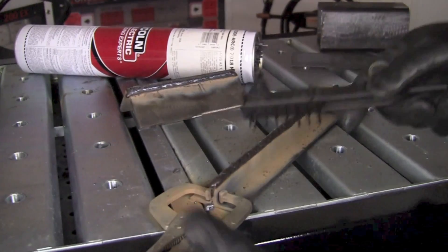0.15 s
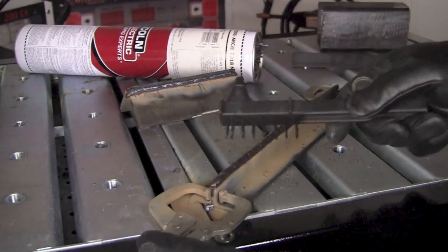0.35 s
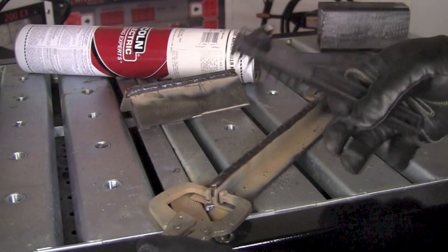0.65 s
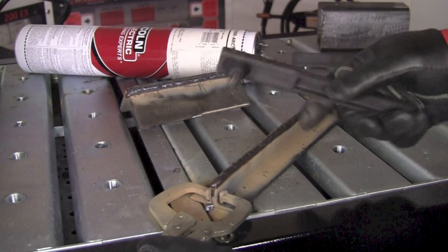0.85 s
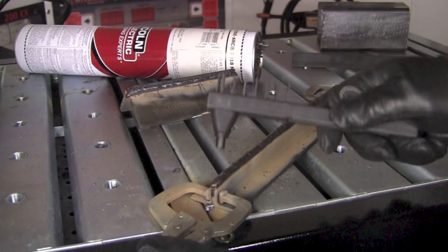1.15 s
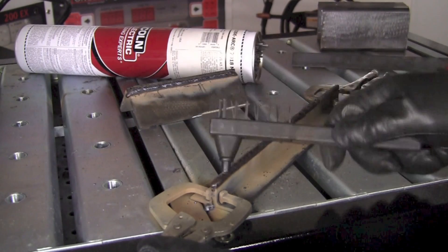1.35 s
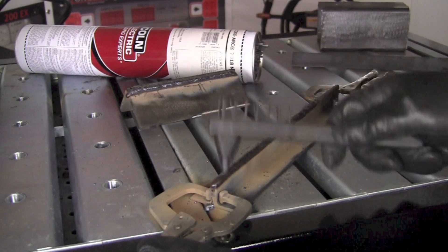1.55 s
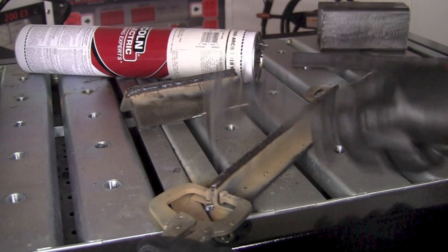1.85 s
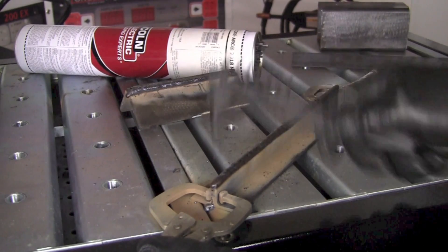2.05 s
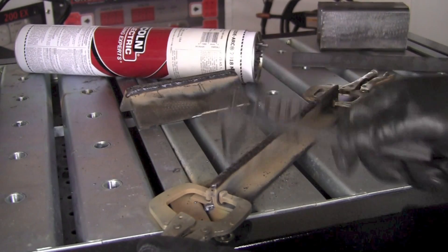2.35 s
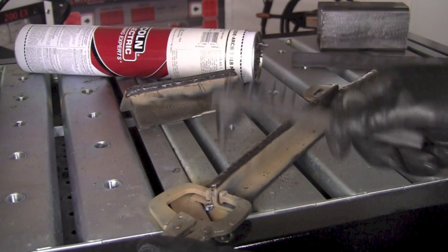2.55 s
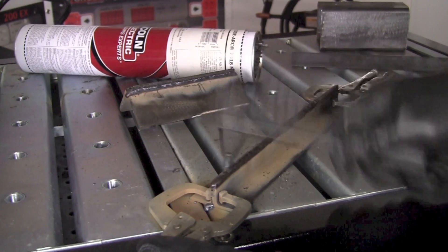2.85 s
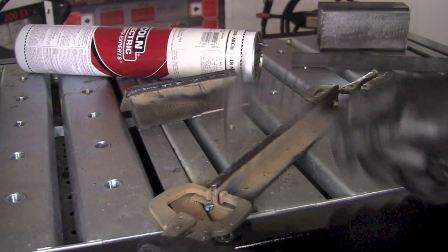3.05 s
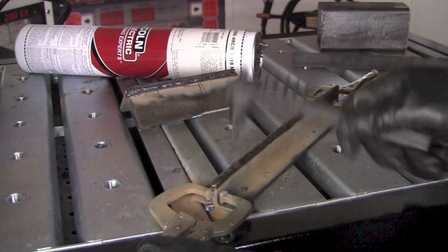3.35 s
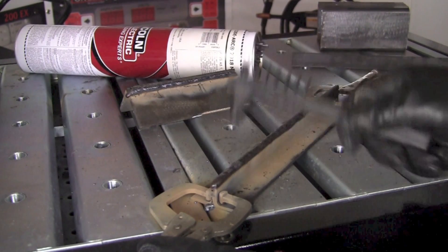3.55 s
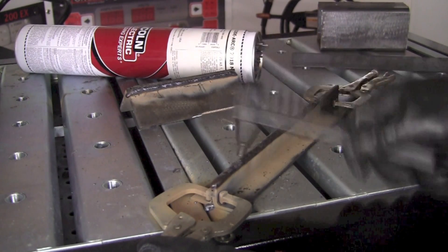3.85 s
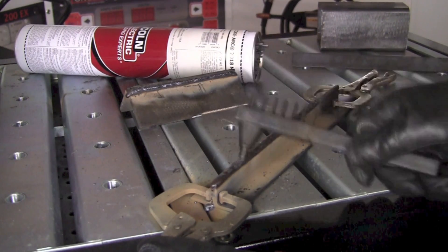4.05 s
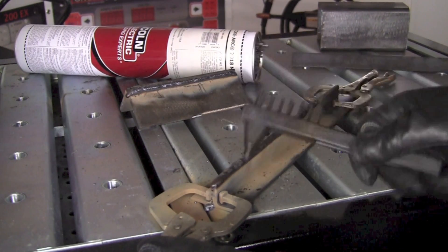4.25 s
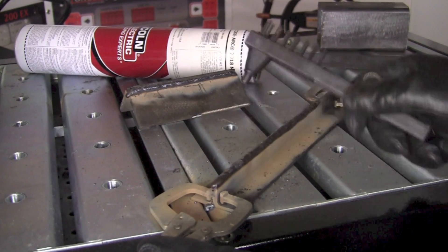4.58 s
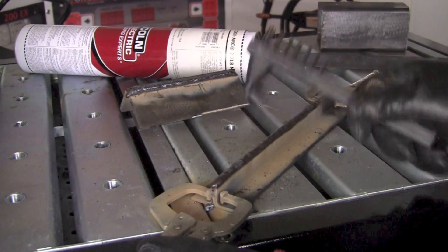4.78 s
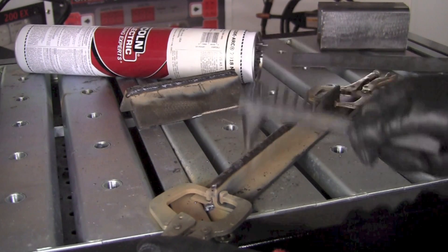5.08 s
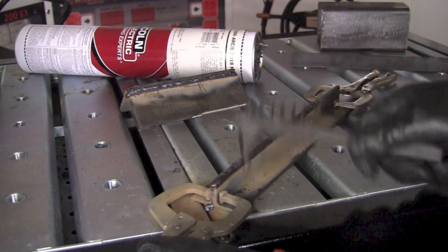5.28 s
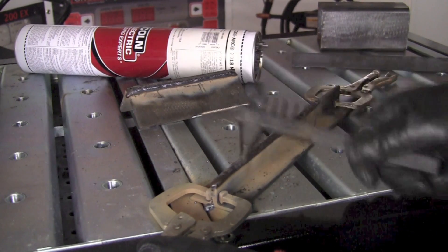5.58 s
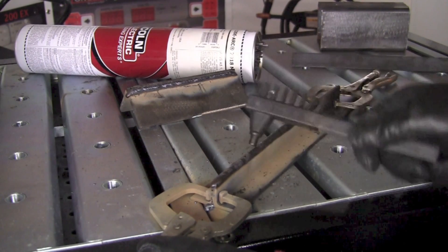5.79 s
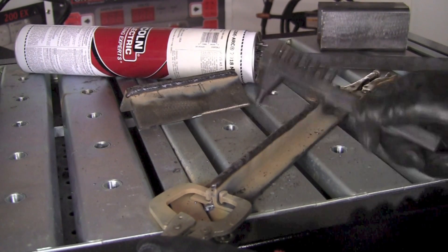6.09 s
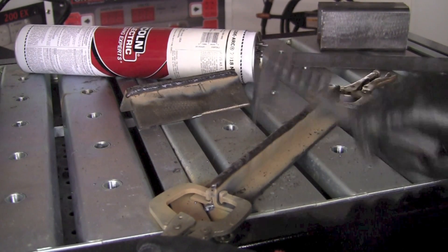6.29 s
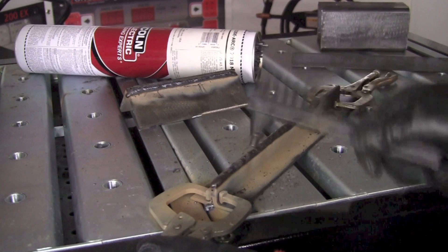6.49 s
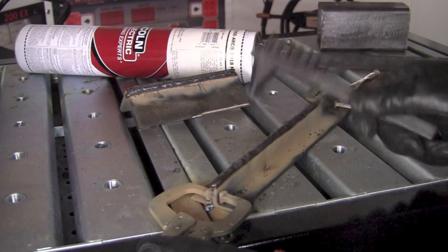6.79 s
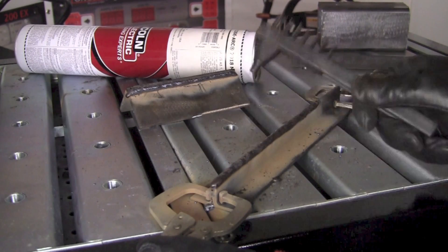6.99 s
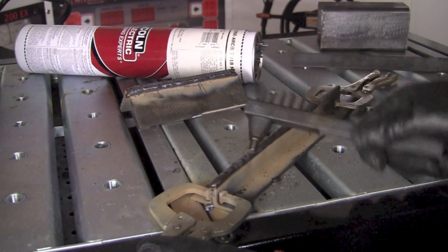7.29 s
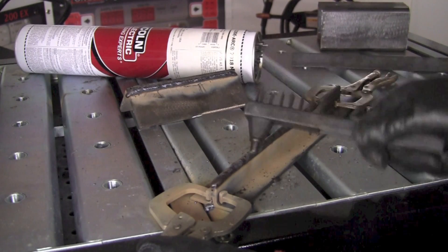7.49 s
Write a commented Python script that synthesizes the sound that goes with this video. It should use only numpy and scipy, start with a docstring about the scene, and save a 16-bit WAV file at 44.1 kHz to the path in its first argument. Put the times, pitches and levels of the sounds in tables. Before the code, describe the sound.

A chipping hammer raps a clamped steel weld about five times a second, sharp and clanky, over a fan roar that sinks away.

```python
"""At a slotted steel table in a workshop, a chipping hammer taps slag off a clamped weld, five blows a second.
A fume fan (shaped noise and duct resonances) roars first; the hammer is brought in with ticks and clunks.
Each blow is a noisy click at the tip plus damped modes of bar and slats, and sends slag flakes skittering
(random impulses), fewer as the weld comes clean. A gain control ducks at the first blow and stays down,
so the fan sinks far behind the tapping."""
import sys
import numpy as np
from scipy import signal
from scipy.fft import rfft, irfft, next_fast_len
from scipy.io import wavfile

SR = 44100
rng = np.random.default_rng(int(sys.argv[2]) if len(sys.argv) > 2 else 0)


def wav_out(sig):
    """Save sig, one row per channel (or a flat mono array), as 16-bit PCM at SR to the path in sys.argv[1]."""
    wavfile.write(sys.argv[1], SR, np.round(np.clip(np.atleast_2d(sig).T, -1, 1) * 32767).astype(np.int16))


N = 336483

# Spectra below give relative levels: each coloured noise is scaled to rms 1 before its own level is set.
# fan air roar: pitch_hz, level_db_per_hz
FAN_SPECTRUM = [(25, -27), (64, -20.5), (100, -14.5), (150, -5), (210, -1), (313, -8), (430, -1.5),
                (500, -5), (590, -10.5), (945, -12.5), (1700, -22.5), (6500, -29.5), (10000, -40),
                (15500, -53)]
# duct resonances: pitch_hz, width_hz, relative level_db
DUCT_RESONANCES = [(126, 24, -8), (168.3, 8.3, 1.5), (201.7, 8, 5), (424, 6, -14), (481, 19, 2.5)]

# wire bristles catching on the steel: start_s, level_db
BRISTLE_TICKS = [(.125, -42.5), (0.252, -41.5), (.399, -42.5), (.566, -40), (.58, -44), (.932, -46)]
# spectrum of a bristle tick: pitch_hz, level_db_per_hz
TICK_SPECTRUM = [(500, -16), (3000, -5), (6200, -1), (10500, -10), (15000, -33)]
# the hammer bumping on the table as it is picked up and aimed: start_s, level_db
TABLE_CLUNKS = [(.38, -21.5), (.397, -23.5), (.421, -29.5), (1.415, -33.5)]
# spectrum of a clunk: pitch_hz, level_db_per_hz
CLUNK_SPECTRUM = [(120, -31), (300, 5), (480, 10), (720, 5), (1000, -4), (1300, 1), (1800, -15),
                  (2500, -13.5), (5000, -39), (12000, -62)]
# decay of the shop's diffuse field: pitch_hz, t60_s
SHOP_DECAY = [(200, 0.71), (1000, 0.63), (4000, 0.54), (8000, 0.35), (14000, 0.7)]

# hammer contacts, rebounds included: start_s, strength_db, hardness_db (bare steel above 0, soft slag below)
CONTACTS = [(1.4772, -15.5, 2), (1.6511, -14, -3.5), (1.8332, -8.5, -2.5), (2.0232, -4, -4),
            (2.2265, -5.5, 0), (2.425, -4, 2), (2.623, -2, 3.5), (2.8179, -3, 4), (3.014, -4, 4.5),
            (3.2211, -4.5, 4.5), (3.4156, -3.5, 4), (3.6152, -4.5, 0), (3.8197, -4.5, -1.5), (4.013, -5, 1),
            (4.201, -4.5, 0), (4.3911, -6, 2), (4.5863, -7.5, -0.5), (4.7895, -4.5, -1), (4.9802, -6, -7),
            (5.1717, -4.5, -1.5), (5.37, -5.5, -7), (5.384, -9, -4), (5.396, -13, 4), (5.5559, -5.5, 0.5),
            (5.737, -3.5, -2), (5.7643, -18, 0), (5.778, -8.5, -0.5), (5.9162, -11.5, 7.5),
            (6.097, -5.5, 2), (6.2797, -7, 3.5), (6.4624, -5, 1.5), (6.6477, -5.5, 3), (6.826, -5.5, 1),
            (7.0077, -5.5, 3.5), (7.2024, -5, -1.5), (7.404, -5, 1), (7.5965, -5, -4)]
# path in toward the clamp, then back along the weld: time_s, place (0 at the clamp, 1 further along)
STRIKE_PATH = [(1.5, 0.2), (2.3, 0.21), (2.8, 0.038), (3.35, 0.22), (3.65, 0.86), (4.6, 1), (7.6, 0.84)]
# modes of bar and table, before scatter: pitch_hz, level_db at the clamp, level_db further along, t60_s
BAR_MODES = [(200, -27, -23, 0.5), (310, -23, -21, 0.38), (910, -9, -19, 0.2), (1003, -18, -12, 0.25),
             (1364, -13, -15, 0.2), (1480, -21, -12, 0.18), (1530, -23, -15, 0.18), (1805, -13, -24, 0.15),
             (1855, -10, -14, 0.15), (2438, -27, -14, 0.25), (2532, -12, -7.5, 0.16),
             (2700, -23, -10, 0.19), (2850, -14, -17, 0.18), (2925, -16, -25, 0.22), (3080, -16, -17, 0.2),
             (3253, -16, -16, 0.25), (4010, -14, -25, 0.22), (4242, -31, -18, 0.25), (4455, -10, -11, 0.13),
             (4503, -17, -17, 0.2), (4873, -8.5, -27, 0.26), (5430, -16, -10, 0.16), (5901, -2, -25, 0.25),
             (6075, -16, -18, 0.14), (6290, -21, -13, 0.15), (6901, -17, -17, 0.2), (7130, -23, -21, 0.2),
             (7414, -11, -26, 0.18), (8409, -14, -24, 0.2), (8600, -20, -17, 0.13)]
# quickly damped steel under the tip, before scatter and scaling: pitch_hz, clamp_db, along_db, t60_s
TIP_MODES = [(2740, -20, -2, 0.029), (5686, 15.5, -0.5, 0.008), (6430, 1.5, 0.5, 0.011),
             (7460, 5.5, -8, 0.011), (8790, -26, -7, 0.033)]
# noisy part of the tip click: pitch_hz, level_db_per_hz
CRACK_SPECTRUM = [(60, -42), (250, -14), (1000, -0.5), (6000, 9), (9000, -2.5), (13000, -17), (16000, -45)]
# dense ring of the table's slats: pitch_hz, level_db_per_hz
SLAT_SPECTRUM = [(60, -48), (130, -50), (210, -10.5), (450, -1.5), (660, -7), (1000, 0), (1880, 2.5),
                 (2200, -5.5), (2800, 2.5), (5100, -0.5), (6200, 2), (8100, -0.5), (9300, -6.5),
                 (12500, -20), (16000, -40)]
# decay of the slats: pitch_hz, t60_s
SLAT_DECAY = [(200, 0.42), (500, 0.56), (1200, 0.21), (4000, 0.17), (8000, 0.14), (14000, 0.14)]
# the hammer's own modes, free to ring after a glancing blow: pitch_hz, level_db (relative), t60_s
HAMMER_MODES = [(3736, 0, .23), (6013, -2, .17), (8619, 0, .11)]
# skittering slag flakes: pitch_hz, level_db_per_hz
FLAKE_SPECTRUM = [(60, -35), (300, 1), (900, 2.5), (2500, -1), (6000, -4.5), (8000, -9), (11000, -31),
                  (16000, -50)]
# steady hiss, added after the gain control: pitch_hz, level_db_per_hz
HISS_SPECTRUM = [(25, 19.5), (100, 6.5), (1000, 5.5), (9000, -0.5), (13000, -6.5), (15200, -3.5),
                 (16000, -30)]

# tip click over the strength; dB more for each dB of hardness
CLICK_DB, CLICK_PER_HARDNESS = 7, 0.26
CLAMP_CLICK_DB = 0.58  # the bar gives least at the clamp, so the tip clicks louder there
# the slag crust muffles the ring by this much at the first blow and is chipped through in this time
CRUST_DB, CRUST_LASTS_S = 8, 0.73
# each blow's spray of flakes: full at first, thinner as the weld comes clean
SPRAY_DB, SPRAY_RISE_S, SPRAY_T60_S = -28, 0.055, 2.4
PLENTY_S, THINNING_DB_PER_S = 0.99, 22  # time from the first blow before thinning starts, then its rate
TOP_HZ = 15800  # upper band limit


def amp(db):
    """Level as an amplitude ratio: 20 dB is a factor of ten."""
    return 10 ** (np.asarray(db) / 20)


def unit(x, span=None):
    """Normalisation: x scaled to rms 1 over its first span samples."""
    return x / np.sqrt(np.mean(x[:span] ** 2) + 1e-20)


def along(points, hz):
    """Interpolation of (pitch_hz, value) points on a logarithmic frequency axis."""
    f, v = np.transpose(points)
    return np.interp(np.log(hz + 1), np.log(f + 1), v)


def filtered(x, response):
    """Linear filtering: the spectrum of x multiplied by a frequency response."""
    n = x.shape[-1]
    m = next_fast_len(n + 8192)
    hz = np.fft.rfftfreq(m, 1 / SR)
    return irfft(rfft(x, m) * response(hz), m)[..., :n]


def coloured(x, spectrum):
    """Spectral shaping: x filtered to a spectrum and scaled to rms 1."""
    return unit(filtered(x, lambda hz: amp(along(spectrum, hz))))


def dying(x, t60s):
    """Frequency-dependent damping: each band of x decays at its own rate."""
    hz, t, bands = signal.stft(x, SR, nperseg=256)
    decay_db = -60 * t / along(t60s, hz)[:, None]
    return signal.istft(bands * amp(decay_db), SR, nperseg=256)[1][:len(x)]


def fade(t, t60):
    """Exponential decay: the level falls 60 dB in t60 seconds."""
    return np.exp(-np.log(1000) * t / t60)


def add(track, s, sound):
    """Superposition: a sound is summed into the track from time s."""
    part = track[round(s * SR):][:len(sound)]
    part += sound[:len(part)]


def low_cut(x, cut_hz, order=2):
    """Causal high-pass: a Butterworth filter attenuates the bass."""
    return signal.sosfilt(signal.butter(order, cut_hz, "highpass", fs=SR, output="sos"), x)


def high_cut(x, cut_hz, order):
    """Zero-phase low-pass with a Butterworth magnitude."""
    return filtered(x, lambda hz: 1 / np.sqrt(1 + (hz / cut_hz) ** (2 * order)))


def duct_response(hz):
    """Resonance: the duct answers as a sum of narrow second-order band-passes."""
    total = 0
    for centre, width, db in DUCT_RESONANCES:
        bandpass = 1j * hz * width / (centre ** 2 - hz ** 2 + 1j * hz * width)
        narrowing = width / np.hypot(width, hz - centre)
        total = total + amp(db) * bandpass * narrowing
    return total


def fan(air_db=-35, duct_db=-39):
    """Flow noise and resonance: steady broadband air roar plus noise made to hum by the duct."""
    air = coloured(rng.standard_normal(N), FAN_SPECTRUM)
    hum = unit(filtered(rng.standard_normal(N), duct_response))
    return amp(air_db) * air + amp(duct_db) * hum


def grit(size, per_s):
    """Random arrivals: sparse tiny impacts of random strength and sign."""
    return rng.standard_normal(size) * (rng.random(size) < per_s / SR)


def workshop(x, walls, room_db=-13):
    """Reverberation: a sound convolved with a diffuse tail, which changes a little as the hand moves."""
    t = np.arange(len(walls)) / SR
    pattern = walls + .6 * rng.standard_normal(len(t))
    tail = dying(pattern, SHOP_DECAY) * (1 - np.exp(-t / 0.0066))
    wet = amp(room_db) * signal.fftconvolve(x, tail / np.linalg.norm(tail))
    add(wet, 0, x)
    return wet


def handling(walls):
    """Impact and friction: decaying grains as bristles tick and the hammer bumps over the table."""
    track, t = np.zeros(N), np.arange(SR // 3) / SR
    for s, tick_db in BRISTLE_TICKS:
        tick = coloured(grit(len(t), 4000), TICK_SPECTRUM) * fade(t, 0.15)
        add(track, s, workshop(amp(tick_db) * tick, walls))
    for s, clunk_db in TABLE_CLUNKS:
        clunk = coloured(grit(len(t), 4000), CLUNK_SPECTRUM) * fade(t, 0.16)
        clunk = clunk * (1 - np.exp(-t / 0.0015))
        add(track, s, workshop(amp(clunk_db) * clunk, walls))
    return track


def ringing(table, place, t, scatter_db=3.0):
    """Modal excitation: damped sines, whose levels depend on the point struck and scatter at random."""
    hz, clamp_db, along_db, t60 = np.transpose(table)[:, :, None]
    level_db = clamp_db + place * (along_db - clamp_db) + rng.normal(0, scatter_db, hz.shape)
    sign = (-1) ** np.arange(len(hz))[:, None]  # neighbouring modes swing in opposite directions
    modes = sign * amp(level_db) * np.sin(2 * np.pi * hz * t) * fade(t, t60)
    return np.sum(modes, axis=0)


def tip_click(place, t, crack_db=1, clamped_db=-8):
    """Local contact: quickly damped modes under the tip plus a short burst of noise, at rms 1 over 3 ms."""
    span = SR * 3 // 1000
    ping = unit(ringing(TIP_MODES, place, t), span)
    crack = unit(coloured(rng.standard_normal(len(t)), CRACK_SPECTRUM) * fade(t, 0.0095), span)
    # at the clamp the tip pings more than it cracks
    return unit(ping + amp(crack_db + clamped_db * (1 - place)) * crack, span)


def slat_ring(shapes, place, t):
    """High modal density: the slats' many modes are heard as decaying coloured noise."""
    # the same slats answer every blow, changing slowly along the weld and a little from tap to tap
    turn = place * np.pi / 2
    pattern = np.cos(turn) * shapes[0] + np.sin(turn) * shapes[1]
    pattern = pattern + .7 * rng.standard_normal(len(t))
    return unit(dying(coloured(pattern, SLAT_SPECTRUM), SLAT_DECAY), SR // 30)


def blow(shapes, ring_db, click_db, bright_db, place, modes_db=0, slats_db=-0.9, tip_db=0):
    """Impact excitation: a hard click under the tip, then the ring of bar and table."""
    t, place = np.arange(shapes.shape[1]) / SR, np.clip(place, 0, 1)
    click = tip_click(place, t)
    ring = amp(slats_db) * slat_ring(shapes, place, t) + amp(modes_db) * ringing(BAR_MODES, place, t)

    def tilt(hz):
        """Contact stiffness: a blow on bare steel is brighter than one cushioned by slag."""
        steps = np.log(np.maximum(hz, 1) / 3000) / np.log(5)
        return amp(bright_db * np.clip(steps, -.5, .6))

    ring = filtered(ring, tilt) * (1 - np.exp(-t / 0.00018))
    return amp(click_db + tip_db) * click + amp(ring_db) * ring


def glancing_ring(t, glance_db=-12):
    """Free vibration: the hammer's own modes decay after a glancing blow."""
    return sum(amp(glance_db + db) * np.sin(2 * np.pi * hz * t) * fade(t, t60) for hz, db, t60 in HAMMER_MODES)


def hammer(walls, glance_s=5.917, bass_hz=155):
    """Repeated impact along a weld: the ring is freed as the crust breaks up; some bounces, one glance."""
    track, t = np.zeros(N), np.arange(SR // 3) / SR
    shapes = rng.standard_normal((2, len(t)))  # the slats' answer at either end of the weld
    for s, strength_db, hard_db in CONTACTS:
        place = np.interp(s, *np.transpose(STRIKE_PATH))
        crust = max(1 - (s - CONTACTS[0][0]) / CRUST_LASTS_S, 0)
        ring_db = strength_db - CRUST_DB * crust
        click_db = strength_db + CLICK_DB + CLICK_PER_HARDNESS * hard_db + CLAMP_CLICK_DB * (1 - place)
        add(track, s, workshop(blow(shapes, ring_db, click_db, hard_db, place), walls))
    add(track, glance_s, glancing_ring(t))
    return low_cut(track, bass_hz, order=4)  # narrow slats radiate no deep bass


def slag(flakes_per_s=5000):
    """Incoherent power addition: overlapping sprays of tiny flake impacts, until little slag is left."""
    power, t = np.zeros(N), np.arange(SR) / SR
    spray = (1 - np.exp(-t / SPRAY_RISE_S)) * fade(t, SPRAY_T60_S)
    for s, _, _ in CONTACTS:
        spent_db = THINNING_DB_PER_S * max(s - CONTACTS[0][0] - PLENTY_S, 0)
        add(power, s, (amp(SPRAY_DB - spent_db) * spray) ** 2)
    return np.sqrt(power) * coloured(grit(N, flakes_per_s), FLAKE_SPECTRUM)


def scene():
    """Superposition at one microphone, the same in both channels."""
    walls = rng.standard_normal(SR * 3 // 4)
    mono = fan() + handling(walls) + hammer(walls) + slag()
    return np.array([mono, mono])


def gain_control(x, threshold_db=-14.5, sink_db_per_s=0.1):
    """Peak-held compression: gain falls within milliseconds above the threshold, then sinks on very slowly."""
    size = SR * 3 // 1000  # 3 ms running mean
    power = signal.lfilter(np.ones(size) / size, 1, x[0] ** 2)
    over_db = np.maximum(10 * np.log10(np.abs(power) + 1e-12) - threshold_db, 0)
    sinking_db = sink_db_per_s * np.arange(N) / SR
    held_db = np.maximum.accumulate(over_db - sinking_db) + sinking_db
    return x * amp(-held_db)


def overload(x):
    """Saturation: the input stage rounds off the highest peaks, oversampled threefold against aliasing."""
    fine = signal.resample_poly(x, 3, 1, axis=1)
    fine = fine / np.sqrt(np.sqrt(1 + (fine / .34) ** 4))
    return signal.resample_poly(fine, 1, 3, axis=1)


def record(dry, hiss_db=-60, low_cut_hz=60, treble_hz=13900):
    """Signal chain: gain control, saturation, bass and treble roll-off, steady added hiss, band limit."""
    x = overload(gain_control(dry))
    x = low_cut(x, low_cut_hz)
    x = high_cut(x, treble_hz, order=16)
    x = x + amp(hiss_db) * coloured(rng.standard_normal(N), HISS_SPECTRUM)
    return filtered(x, lambda hz: hz < TOP_HZ)


dry = scene()
out = record(dry)
wav_out(out)
```